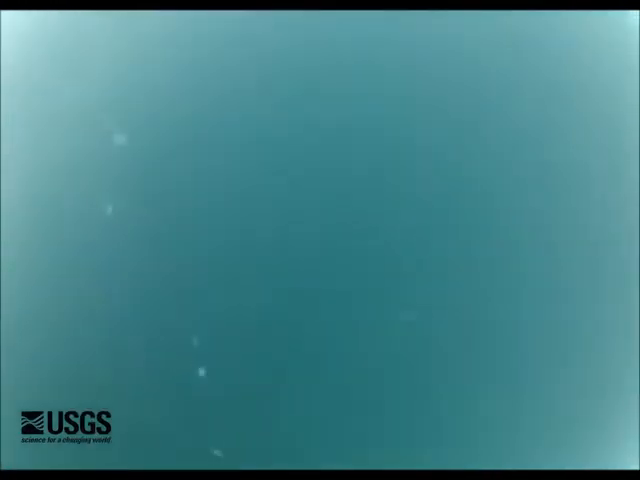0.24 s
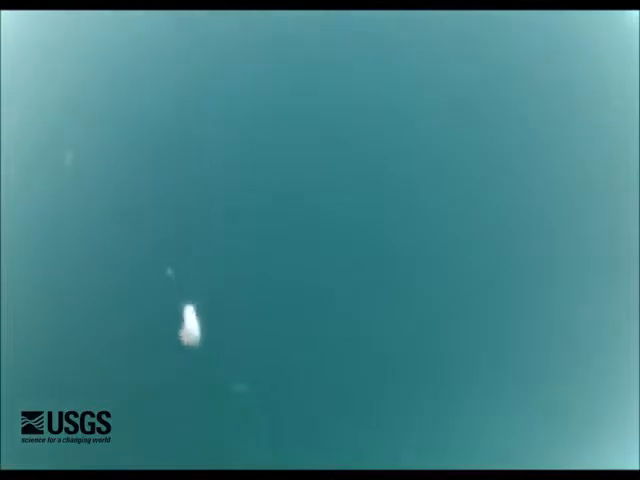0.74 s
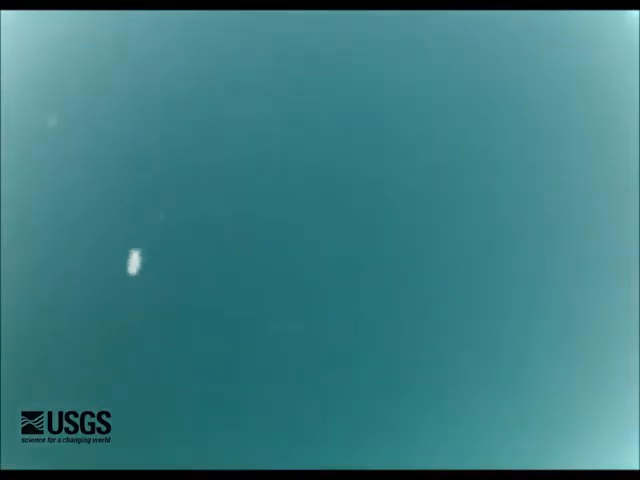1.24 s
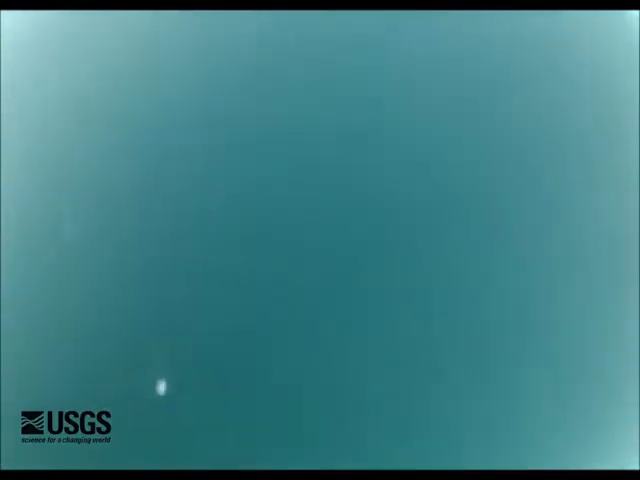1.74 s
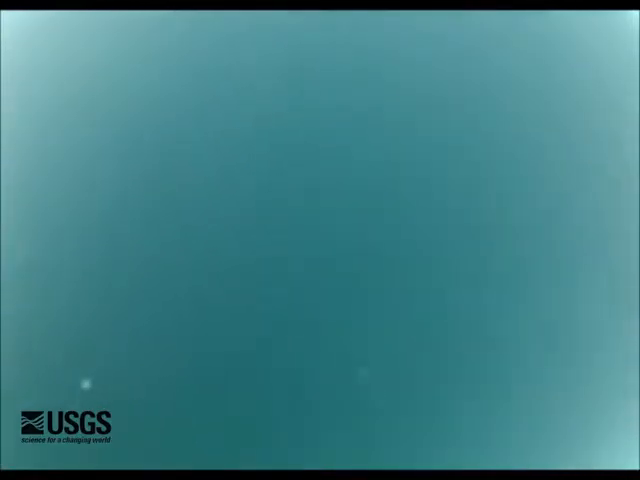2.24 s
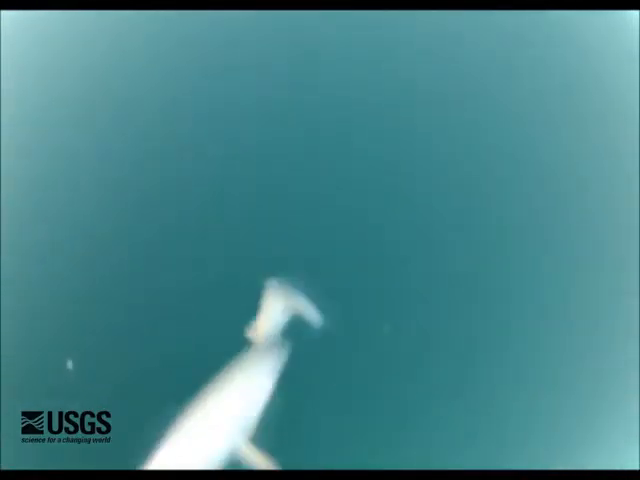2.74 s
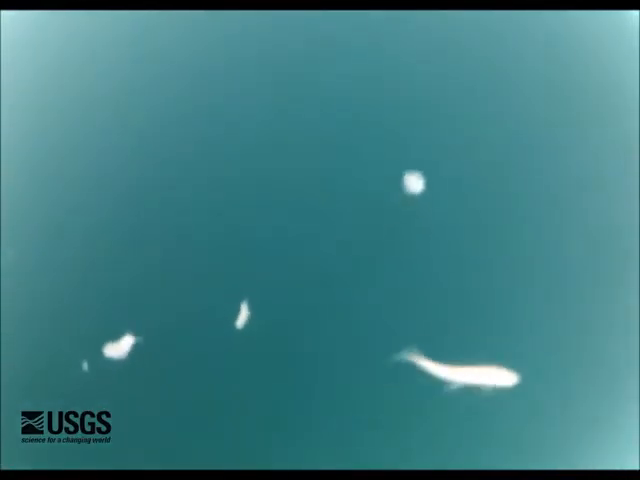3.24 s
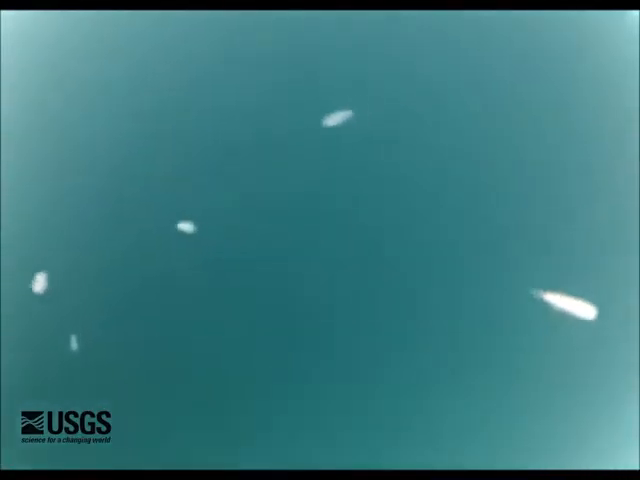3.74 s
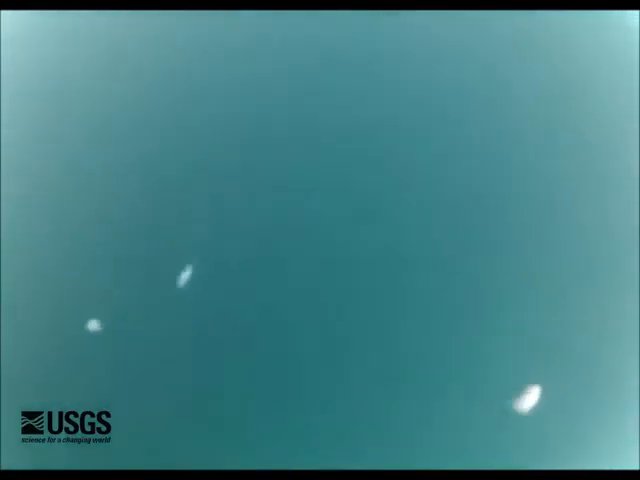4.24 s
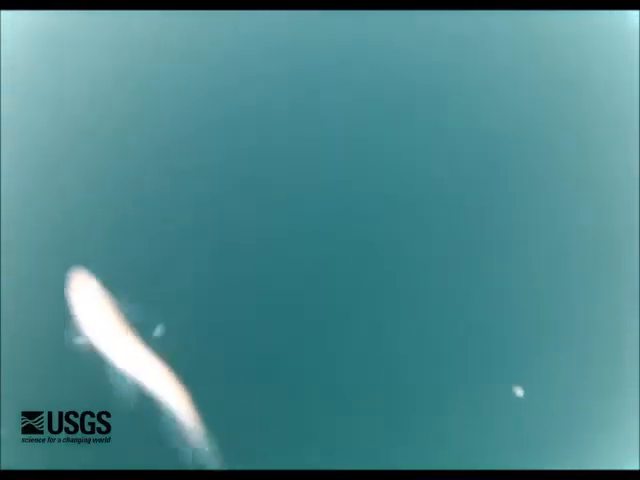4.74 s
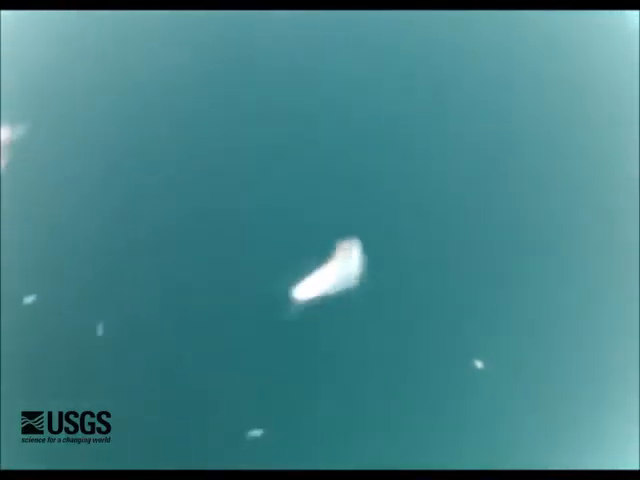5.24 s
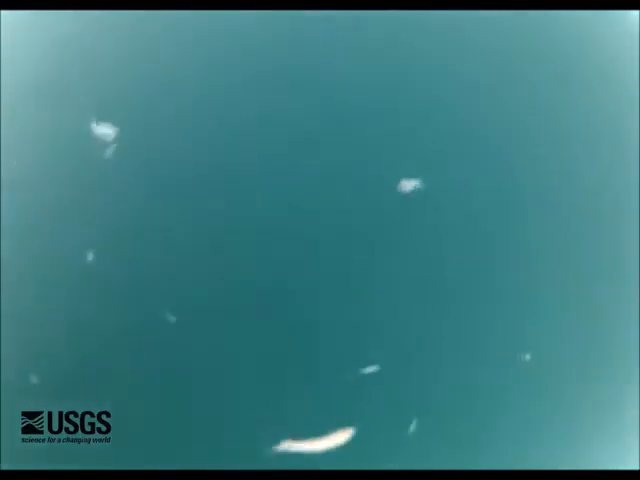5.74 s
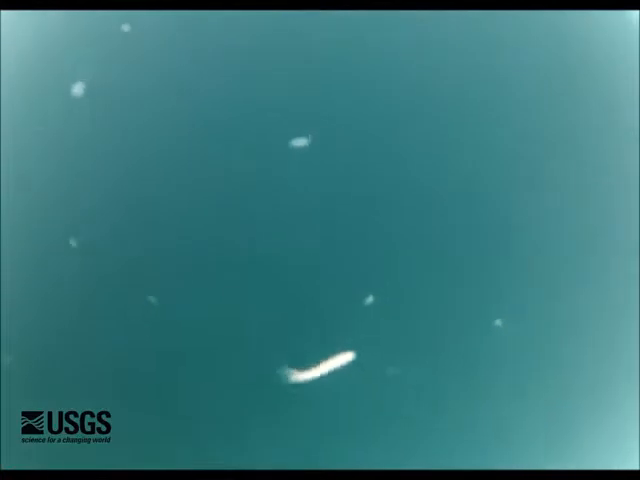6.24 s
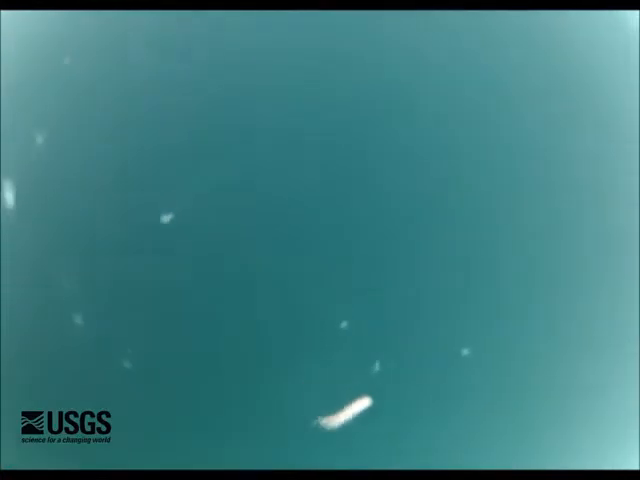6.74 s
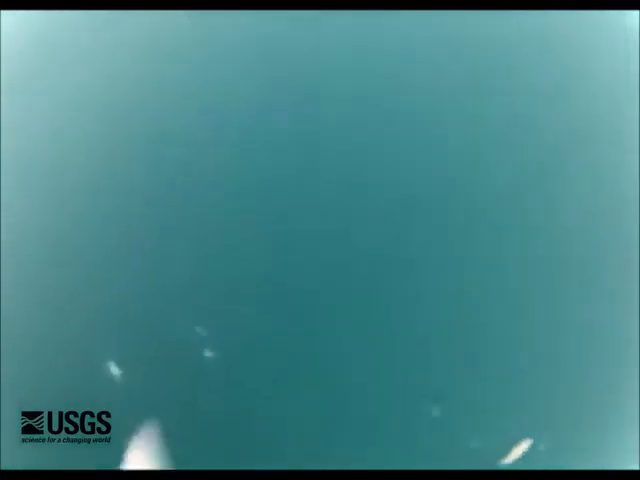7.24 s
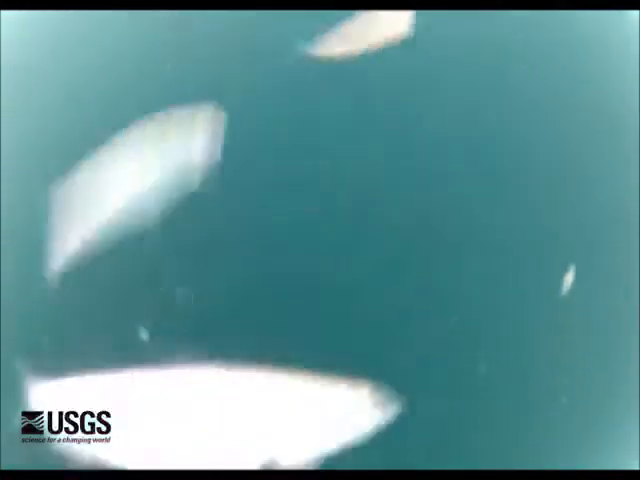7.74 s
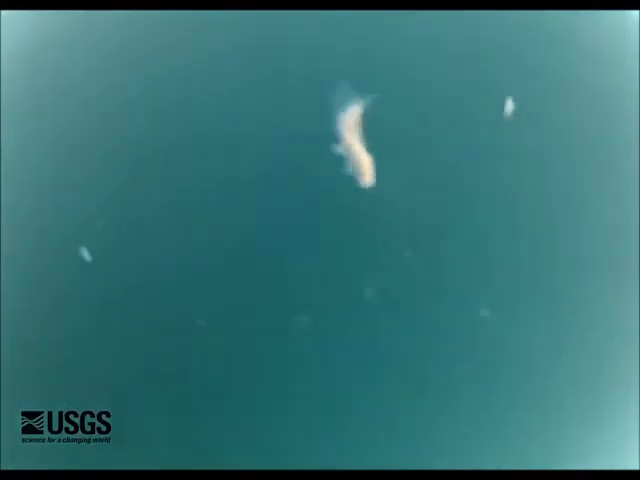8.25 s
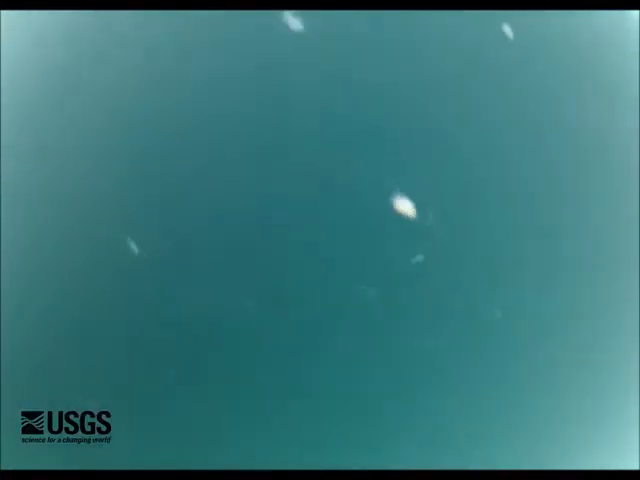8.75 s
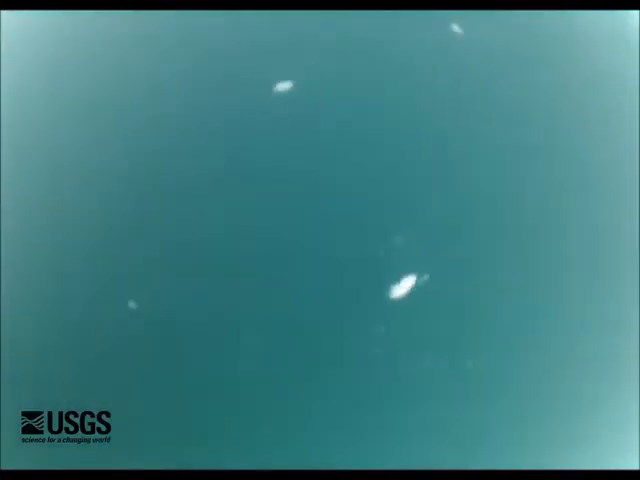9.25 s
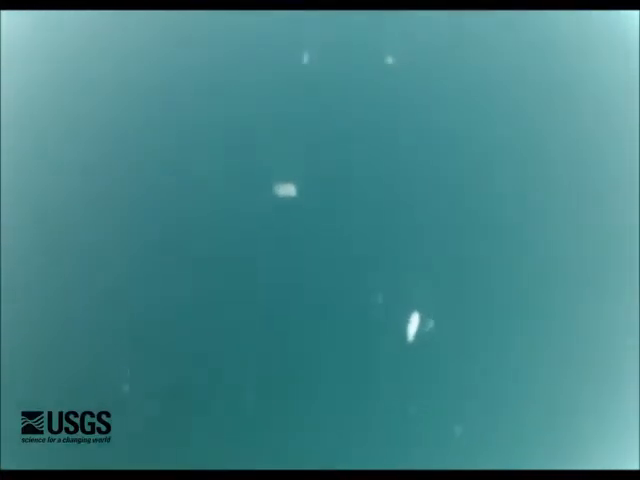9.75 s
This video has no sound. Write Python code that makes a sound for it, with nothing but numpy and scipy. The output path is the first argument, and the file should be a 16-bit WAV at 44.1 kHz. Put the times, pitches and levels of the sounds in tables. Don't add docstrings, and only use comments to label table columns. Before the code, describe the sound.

An even, buzzing engine drone fills the water from start to finish, thick with low hum and fluttering clatter. A deep hum drops out at two seconds, a thin gear whine wavers, and a loose plate booms softly. After eight seconds there are tiny ticks and a few short, hollow bubble knocks. The cheap underwater microphone adds a faint metallic treble edge; the fish make no sound.

```python
import sys
import numpy as np
from scipy import signal
from scipy.fft import rfft, irfft, next_fast_len
from scipy.io import wavfile
from scipy.ndimage import map_coordinates

SR = 44100
rng = np.random.default_rng(int(sys.argv[2]) if len(sys.argv) > 2 else 0)


def digitize_waveform(pressure):
    field = np.atleast_2d(pressure).T
    bounded = np.clip(field, -1, 1)
    quanta = np.round(bounded * 32767).astype(np.int16)
    wavfile.write(sys.argv[1], SR, quanta)


def magnitude_from_level(level_db):
    exponent = np.asarray(level_db, float) / 20
    return 10 ** exponent


N = 440559
SAMPLING_HZ = 12000


def along(points, hz):
    f, v = np.transpose(points)
    return np.interp(np.log(hz + 1), np.log(f + 1), v, left=-200, right=-200)


def wobble(rate):
    knots = rng.standard_normal(int(N * rate / SR) + 4)
    return map_coordinates(knots, [np.arange(N) * rate / SR])


def noise(gain):
    size = next_fast_len(N)
    white = rfft(rng.standard_normal(size)) * np.sqrt(SR / 2)
    return irfft(white * gain(np.fft.rfftfreq(size, 1 / SR)), size)[:N]


def narrow(hz, width_hz):
    ringing = noise(lambda f: 1 / (1 + ((f - hz) / width_hz) ** 2))
    return ringing / np.sqrt(np.mean(ringing ** 2) + 1e-20)


def hum(hz, db, wander, rate):
    phase = 2 * np.pi * np.cumsum(hz + np.zeros(N)) / SR
    phase = phase + wander * wobble(rate) + 2 * np.pi * rng.random()
    return np.sqrt(2) * magnitude_from_level(db) * np.sin(phase)


# frequency in Hz, level in dB per Hz.
HULL_LOW = [(15, -74), (45, -71), (64, -62.5), (85, -51), (97, -47.5), (118, -59), (139, -43), (155, -53.5),
            (165, -42), (176, -55.5), (250, -52), (340, -51), (380, -51), (420, -60)]
# frequency in Hz, level in dB per Hz.
HULL_MID = [(470, -55), (550, -58.5), (615, -54.5), (660, -55.5), (715, -60), (770, -64), (850, -59.5),
            (940, -63.5), (1010, -63.5), (1150, -74.5), (1270, -58), (1340, -66), (1420, -79.5),
            (1700, -200)]
# frequency in Hz, level in dB per Hz.
CLATTER = [(1380, -29.5), (1510, -11.5), (1660, -11), (1750, -6.5), (2020, 0), (2260, -1.5), (2700, -9.5),
           (3150, -20.5), (3500, -13), (4060, -33.5), (4650, -30.5), (5300, -40.5), (5700, -47.5),
           (5950, -80)]


def housing(hz):
    grid = np.arange(1, SR // 2)
    clatter_scale = magnitude_from_level(-37) / np.linalg.norm(magnitude_from_level(along(CLATTER, grid)))
    hull = magnitude_from_level(along(HULL_LOW + HULL_MID, hz))
    return np.hypot(hull, clatter_scale * magnitude_from_level(along(CLATTER, hz)))


def valve_band(hz):
    return 1 / (1 + ((hz - 3500) / 330) ** 4)


# time in seconds, level in dB.
SWELL = [
    (0.0, -1),
    (9.99, -1.5),
]


def hull_rumble(crank):
    low = noise(lambda hz: housing(hz) * (hz < 500))
    high = noise(lambda hz: housing(hz) * (hz >= 500) * (1 - 0.14 * valve_band(hz)))
    pulse_db = 0.71 * np.sin(2 * np.pi * crank) + 0.5 * np.sin(4 * np.pi * crank + 0.39) - 1.0
    swell_s, swell_db = np.transpose(SWELL)
    gusts_db = 0.45 * wobble(5.7) + 0.38 * wobble(18) + np.interp(np.arange(N) / SR, swell_s, swell_db)
    return magnitude_from_level(gusts_db) * (low + high * magnitude_from_level(pulse_db))


# frequency
# in Hz, rms level in dB, phase wander in radians.
STEADY_TONES = [
    (59.31, -39, .15),
    (167.43, -30, .3),
    (1403, -70, .5),
    (1433, -62, .6),
    (1463, -70, .5),
    (1791, -62, .5),
]


def pumps_and_fan():
    t = np.arange(N) / SR
    pumps = sum(hum(hz, db + 1.0 * wobble(2.5), wander, rate=2.5) for hz, db, wander in STEADY_TONES)
    fan = hum(1599.9, -52 + 2.5 * wobble(5), wander=1.5, rate=4)
    load_off_s, load_fade_s = 2.0, .2
    load_db = -41 - 19 * np.clip((t - load_off_s) / load_fade_s, 0, 1)
    return pumps + fan + hum(40.03, load_db, wander=.1, rate=1.5)


def slipping_pump(crank):
    slip_turns = .763 * (np.arange(N) / SR - 1.55)
    return -np.sqrt(2) * magnitude_from_level(-34) * np.cos(2 * np.pi * (7 * crank - slip_turns))


# centre in seconds, change in dB, half length in seconds.
GEAR_SHIFTS = [(0.9, 2.5, 0.52), (2.6, -8, 0.31), (3.297, -13, 0.31), (5.0, -10, .15), (5.95, -8, 0.066),
               (6.394, 6.5, 0.27), (7.05, -20, 0.1), (7.5, 6.5, 0.3), (8.1, -11, 0.3), (8.65, 0, 0.092),
               (9.22, -10, .1), (9.45, 3, 0.12)]


def gear_whine():
    t = np.arange(N) / SR
    path_db = sum(db * np.exp(-((t - s) / half) ** 2) for s, db, half in GEAR_SHIFTS)
    whine = hum(716.49, -37.5 + path_db, wander=.5, rate=3)
    skirt = magnitude_from_level(-47 + .5 * path_db) * narrow(716.2, width_hz=2.2)
    return whine + skirt


# peak time in seconds, rms level in dB.
BOOMS = [
    (0.1, -34),
    (1.3, -39),
    (2.1, -38),
    (2.55, -34),
    (3.4, -41),
    (4.15, -29),
    (7.5, -32),
    (9.0, -41),
    (9.9, -36),
]


def loose_plate():
    plate_hz, rise_s, fall_s = 71, 0.091, 0.16
    t = np.arange(N) / SR
    booms = np.zeros(N)
    for s, db in BOOMS:
        half = np.where(t < s, rise_s, fall_s)
        booms += magnitude_from_level(db) * np.exp(-((t - s) / half) ** 2)
    idle = magnitude_from_level(-45.5) * narrow(plate_hz, width_hz=2.9)
    return idle + booms * hum(plate_hz, 0, wander=1.2, rate=3)


# start in seconds, peak level in dB, pitch in Hz,
# time to die away by 60 dB in seconds.
KNOCKS = [
    (8.005, -15, 606, .035),
    (8.663, -14, 540, .04),
    (8.675, -9, 625, .06),
    (8.8225, -6, 640, .05),
    (8.8415, -5, 570, .04),
]
# start in seconds, peak level in dB.
TICKS = [
    (8.4083, -52),
    (8.4164, -54),
    (8.4642, -54),
]


def knocks():
    out = np.zeros(N + SR)
    t = np.arange(SR // 4) / SR
    soft_start = 1 - np.exp(-t / .003)
    ticks = [(s, db + 9, 4600, .02) for s, db in TICKS]
    for s, db, hz, t60 in KNOCKS + ticks:
        ring = magnitude_from_level(db - 60 * t / t60) * np.sin(2 * np.pi * hz * t)
        out[round(s * SR):][:len(t)] += soft_start * ring
    return out[:N]


def valve_rattle(cam):
    since = (2 * cam - .49) % 1
    shut = np.exp(-since / .11) * (1 - np.exp(-since / 0.013))
    bounce = .5 * np.exp(-((since - .28) / .04) ** 2)
    clatter = noise(lambda hz: housing(hz) * valve_band(hz))
    return clatter * (shut + bounce) * magnitude_from_level(4.0 + 1.3 * wobble(7.9))


def engine(cycle_hz, orders, arrival, turn, blur_hz, loose, rest_db, slip_s, count=4, size=2 ** 15):
    order = np.arange(int(SAMPLING_HZ / 2 / cycle_hz))
    hz = order * cycle_hz
    level = housing(hz) * magnitude_from_level(rest_db + 2.7 * rng.standard_normal(len(hz)))
    level = level / (1 + (hz / 2600) ** 4)
    for listed, db in orders:
        level[round(listed)] = magnitude_from_level(db)
    blur = (hz / blur_hz) ** 2 + loose(hz) * (order % count > 0)
    delay_angle = 2 * np.pi * cycle_hz * np.cumsum(along(arrival, hz + 1))
    angle = turn - delay_angle + blur * rng.standard_normal(len(hz))
    cycle = irfft(level * np.exp(1j * angle), size) * size / np.sqrt(2)
    hunting_s = slip_s * wobble(1.501) + 0.24 * slip_s * wobble(8)
    phase = cycle_hz * (np.arange(N) / SR + hunting_s)
    return np.interp(phase % 1 * size, np.arange(size), cycle, period=size), phase


# multiple, rms level in dB.
DIESEL_SHAFT = [(4, -48), (7, -45), (8, -34), (10, -34), (13, -47), (14, -30), (16, -56), (19, -49),
                (20, -41), (22, -49), (26, -43), (28, -44), (31, -50), (32, -46), (34, -46), (35, -50),
                (38, -50), (40, -45), (44, -50), (46, -50), (49, -48), (50, -52), (55, -51), (56, -55),
                (59, -45), (61, -44), (62, -46), (67, -50), (70, -53), (80, -50), ]
# multiple, rms level in dB.
DIESEL_HALF = [(11, -53), (17, -50), (19, -39), (23, -40), (25, -40), (29, -42), (31, -48), (37, -50),
               (41, -49), (47, -49), (49, -39), (59, -46), (61, -47), (65, -45), (67, -45), (73, -46),
               (91, -48), (97, -50), (101, -52), (103, -53), (125, -52), (133, -51), (143, -48), (173, -54)]
# frequency in Hz, delay in seconds.
DIESEL_ARRIVAL = [(1, .017), (6000, .017)]


def main_diesel():
    shaft = [(2 * order, db) for order, db in DIESEL_SHAFT]
    return engine(4.9997, shaft + DIESEL_HALF, DIESEL_ARRIVAL, turn=-2.2, blur_hz=150,
                  loose=lambda hz: np.pi, rest_db=-1, slip_s=1e-4)


# multiple, rms level in dB.
GENSET_LOW = [(2, -43), (3, -60), (4, -51), (5, -49), (6, -43), (7, -33), (8, -33), (9, -33), (10, -36),
              (11, -44), (12, -28), (13, -42), (14, -48), (15, -41), (16, -35), (17, -45), (18, -45),
              (19, -39), (20, -40), (21, -44), (22, -35), (23, -41), (24, -38), (25, -37), (26, -35),
              (27, -47), (28, -50), (29, -140), (30, -42), (31, -46)]
# multiple of the cycle, rms level in dB.
GENSET_HIGH = [(32, -50), (35, -55), (36, -46), (37, -47), (38, -44), (39, -54), (40, -38), (41, -42),
               (42, -41), (43, -51), (44, -47), (45, -52), (46, -52), (48, -48), (50, -54), (54, -57),
               (56, -45), (59, -52), (64, -57), (65, -54), (71, -55), (80, -58), (81, -56), (82, -56),
               (85, -57), (86, -54)]
# frequency in Hz, delay in seconds.
GENSET_ARRIVAL = [(1, 0), (240, 0), (290, .013), (6000, .011)]


def generator_set():
    sound, crank = engine(14.999, GENSET_LOW + GENSET_HIGH, GENSET_ARRIVAL, turn=np.pi, blur_hz=500,
                          loose=lambda hz: .5 + .4 * (hz < 260), rest_db=3, slip_s=6e-5)
    return sound * magnitude_from_level(0.97 * wobble(4)), crank


def scene():
    genset, crank = generator_set()
    diesel, cam = main_diesel()
    background = hull_rumble(crank) + pumps_and_fan() + slipping_pump(crank) + gear_whine()
    housing_and_plate = loose_plate() + knocks() + valve_rattle(cam)
    ends = np.minimum(np.arange(N) + 2, np.arange(N)[::-1]) / 5
    return ((background + housing_and_plate + diesel + genset) * np.minimum(ends, 1))[None]


def low_pass(x):
    return signal.sosfilt(signal.butter(12, 15250, fs=SR, output="sos"), x)


def record(dry):
    size = 147 * 3072
    step = size * SAMPLING_HZ // SR
    bins = np.arange(size // 2 + 1)
    folded = (bins + step // 2) % step - step // 2
    base = rfft(dry[0], size)[np.abs(folded)]
    repeated = np.where(folded < 0, base.conj(), base)
    slope = np.sinc(bins / step) / np.sinc(folded / step)
    hold = slope * np.exp(-1j * np.pi * (bins - folded) / step)
    lift = magnitude_from_level(1.8 * np.clip(bins / step - 1, 0, 1) * 4)
    held = irfft(repeated * hold * lift, size)[None, :N]
    return low_pass(held)


dry = scene()
out = record(dry)
digitize_waveform(out)
```